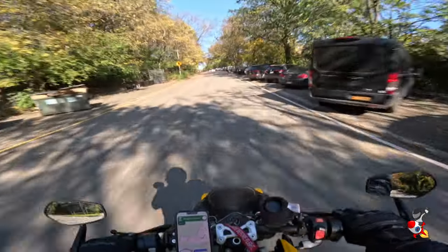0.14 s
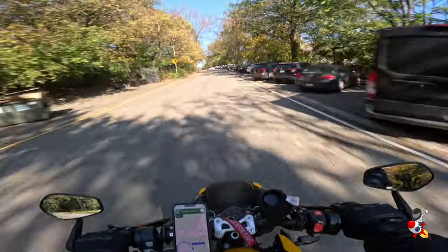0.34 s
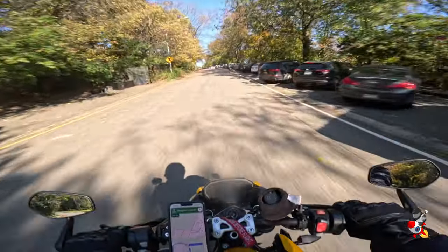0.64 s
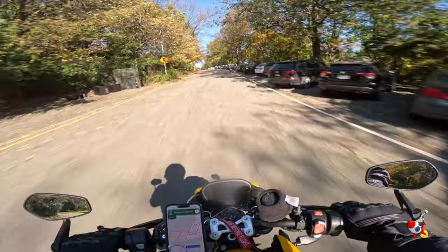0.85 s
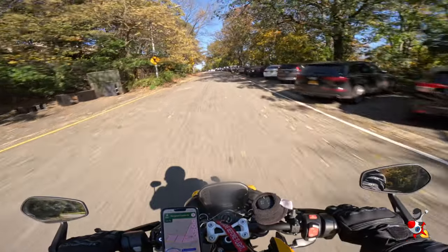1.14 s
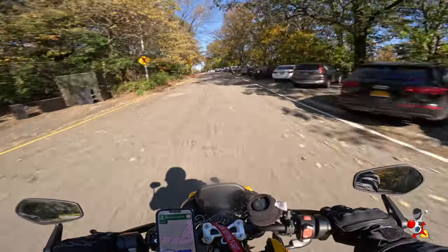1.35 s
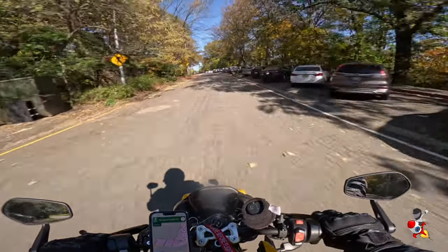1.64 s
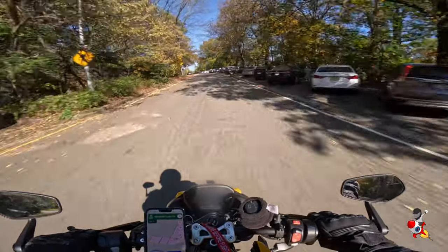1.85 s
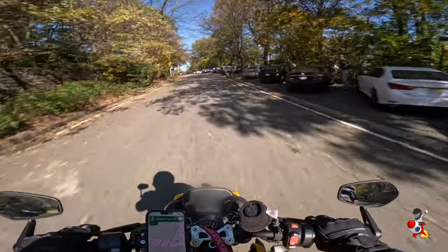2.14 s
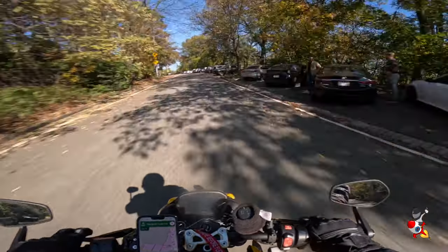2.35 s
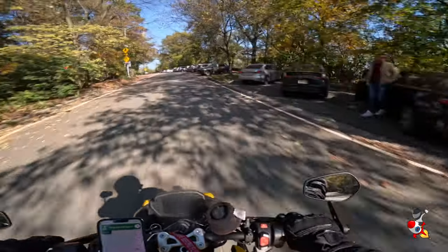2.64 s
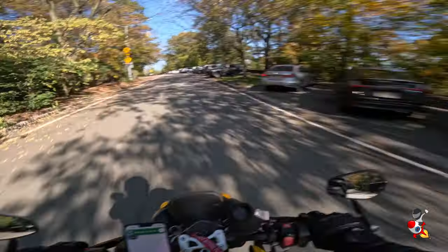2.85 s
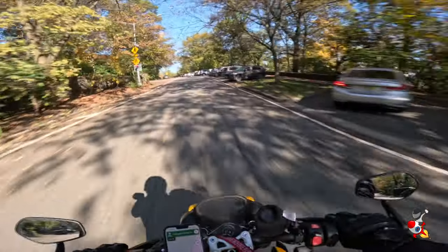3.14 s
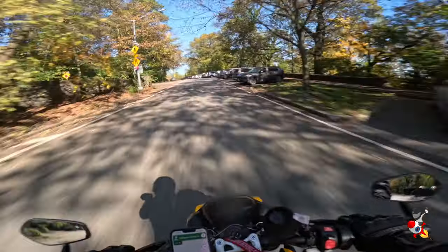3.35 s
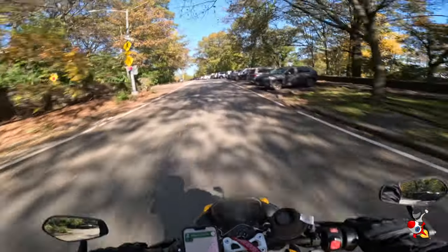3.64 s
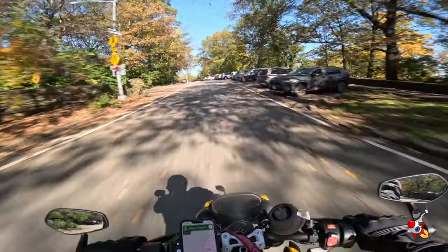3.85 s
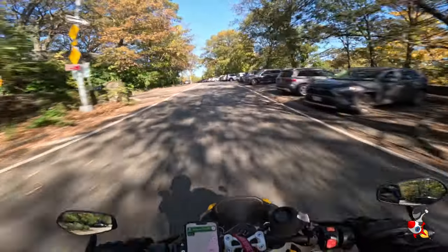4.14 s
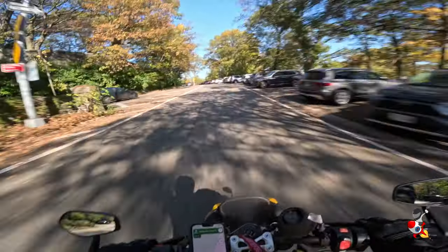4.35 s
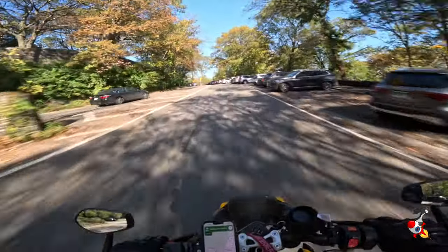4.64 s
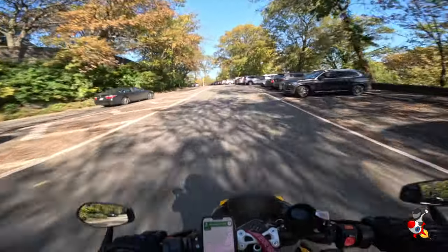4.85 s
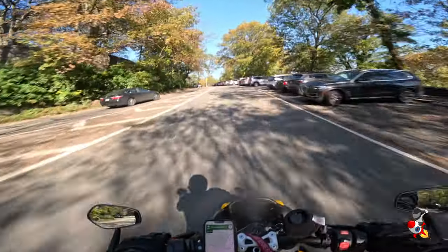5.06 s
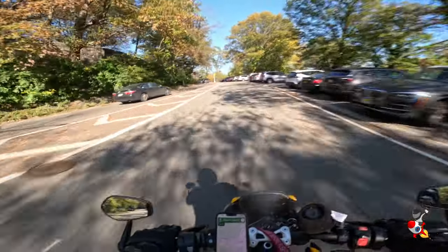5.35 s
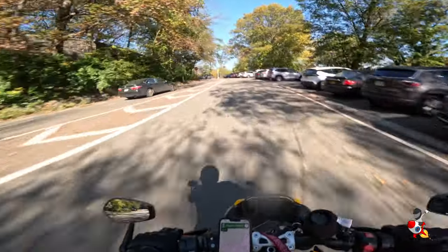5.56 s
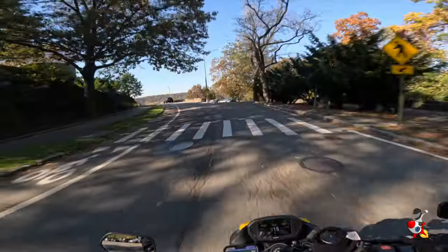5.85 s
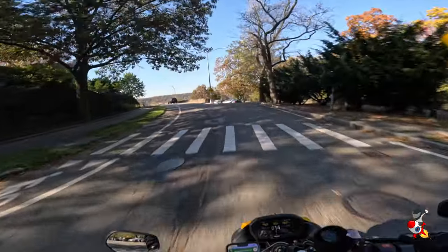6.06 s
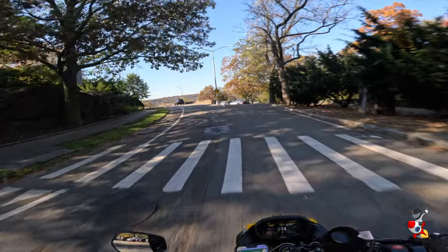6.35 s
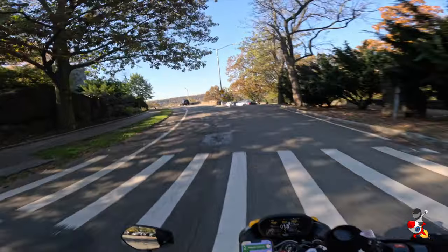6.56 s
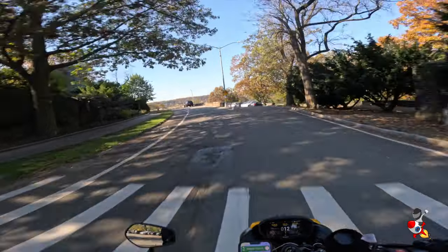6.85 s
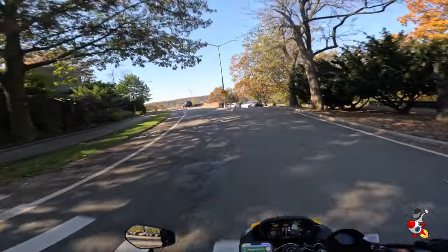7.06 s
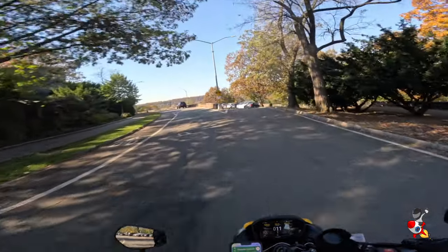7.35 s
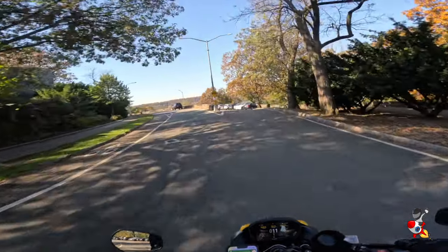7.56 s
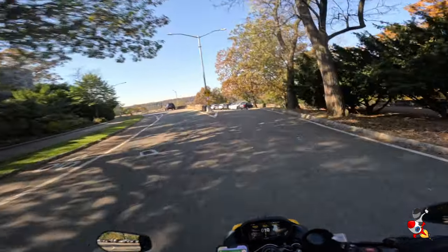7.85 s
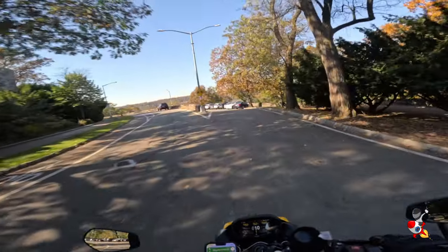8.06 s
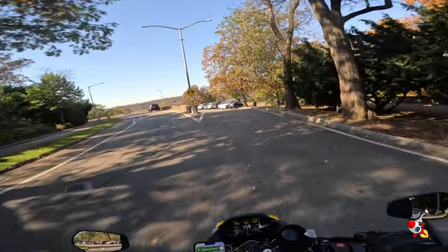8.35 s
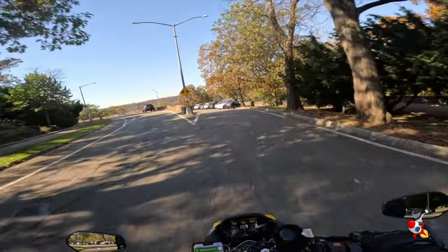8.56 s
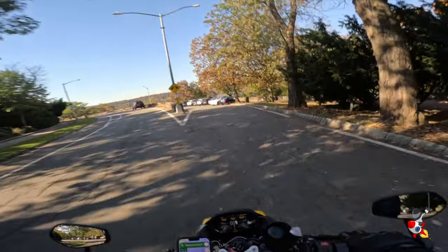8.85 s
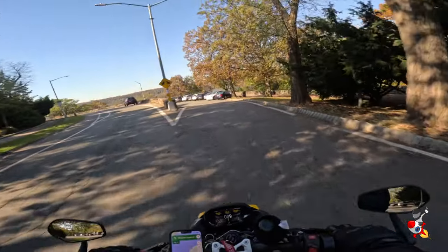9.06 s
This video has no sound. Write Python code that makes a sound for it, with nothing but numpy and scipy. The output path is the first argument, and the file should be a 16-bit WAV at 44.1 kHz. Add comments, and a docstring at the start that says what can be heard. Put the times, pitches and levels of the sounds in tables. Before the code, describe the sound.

Heard from the saddle, a motorcycle pulls gently, rolls off with soft exhaust pops, then cuts to a lower drone in light wind.

```python
"""A three-cylinder motorcycle on a park road, microphone at the saddle, in light wind and tyre roar.
Firing pulses ring the exhaust pipe while valves and gears rustle close by. The bike pulls gently, holds
its speed as gusts thump the microphone, then rolls off with a burble and pops of late-burning charges.
After an abrupt cut with a click it runs at lower revs, coasts with more soft pops and picks up again."""
import sys
import numpy as np
from scipy import signal
from scipy.fft import rfft, irfft, next_fast_len
from scipy.io import wavfile
from scipy.ndimage import uniform_filter1d

SR = 44100
rng = np.random.default_rng(int(sys.argv[2]) if len(sys.argv) > 2 else 0)


def unload_audio(sound):
    """Save the sound as a 16-bit wav file, at the path given as the first command line argument."""
    columns = np.transpose(np.atleast_2d(sound))
    # keep every value between -1 and 1, then stretch to whole-number steps
    steps = np.round(np.clip(columns, -1, 1) * 32767)
    wavfile.write(sys.argv[1], SR, steps.astype(np.int16))


N = 405719
TIME = np.arange(N) / SR
CUT_S = 5.845

# engine speed, cruising before the cut and rolling slowly after it: time_s, firing_hz
REVS_CRUISE = [(0, 83.1), (.5, 83.8), (.8, 86.9), (1.35, 94), (1.9, 100.8), (2.25, 103.5), (2.55, 104.6),
               (3.18, 102.2), (3.4, 103), (3.55, 101.1), (4, 99.1), (4.28, 98.8), (4.87, 96), (5.07, 90.5),
               (5.2, 92.6), (5.5, 86.9), (5.83, 82.6)]
REVS_SLOW = [(5.87, 63.2), (6.3, 62.5), (6.5, 64.2), (6.72, 64.3), (6.87, 59.6), (7, 61.1), (7.5, 51),
             (7.9, 45.2), (8.3, 45.7), (8.45, 44.5), (8.85, 45.7), (9.2, 47.4)]
# the rider's hand on the throttle: time_s, opening_share
THROTTLE_CRUISE = [(0, 0.45), (.48, 0.5), (.75, 0.74), (1.4, 1), (2.1, 1), (2.6, 0.81), (3.2, 0.58),
                   (3.9, 0.59), (4.84, 0.71), (4.97, 0.11), (5.8, 0.01)]
THROTTLE_SLOW = [(5.885, 0.033), (5.905, .55), (6.7, 0.7), (6.8, 0.059), (7.95, .03), (8.1, 0.32),
                 (8.8, 0.6), (9.2, 0.54)]
# the exhaust pipe's response, heard from the saddle: frequency_hz, relative_db
PIPE_CRUISE = [(40, -50), (110, 3), (250, 6.5), (295, -1), (345, 7.5), (420, -3), (530, 3), (620, -12),
               (715, -15.5), (825, -12.5), (950, -27), (1450, -22), (2500, -51.5), (6000, -94.5)]
PIPE_SLOW = [(35, -9), (90, -9.5), (135, 7.5), (190, 1.5), (238, -15.5), (280, -0.5), (325, 0), (385, -7.5),
             (500, -10), (580, -36), (720, -47), (900, -63), (2500, -65.5), (6000, -94)]
# how strongly the pipe booms at each low pitch on an open throttle: pitch_hz, relative_db
PIPE_BOOM = [(44, -44), (55, -35), (63, -35.5), (87, -32), (100, -37), (105, -38), (126, -34), (165, -37.5),
             (173, -36), (191, -42.5), (203, -36.5), (210, -34)]
# spectrum of the valve train and gears: frequency_hz, relative_db
RUSTLE_CRUISE = [(400, -13.5), (900, -11.5), (1700, -11), (2000, -13), (2300, -14.5), (2700, -16.5),
                 (3400, -22.5), (5300, -28), (6200, -34), (7200, -36), (8000, -45), (11500, -48.5),
                 (13500, -56)]
RUSTLE_SLOW = [(400, -24.5), (850, -31), (1050, -14.5), (1200, -26), (1400, -12), (1900, -18.5),
               (2250, -23.5), (2600, -25), (3000, -33), (4200, -37), (7000, -45), (8000, -52),
               (13500, -60.5)]
# the two rings of the engine cases: pitch_hz, width_hz, relative_db
CASE_RINGS = [(1348, 54, -17.5), (2040, 34, -17)]
# spells in which the lower ring rattles harder: start_s, end_s, rise_db
CASE_RATTLES = [(2.5, 3.35, 7), (8.2, 9.3, 7)]
# wind rumble on the microphone mixed with tyre and road roar: frequency_hz, relative_db
WIND_ROAD_SPECTRUM = [(15, -33), (45, 3.5), (100, -4.5), (250, -1), (450, -4), (700, -20), (1000, -34.5),
                      (1600, -47), (6000, -99)]
# strength of that rumble and roar: time_s, level_db
WIND_ROAD_LEVELS = [(0, -43.5), (2.7, -43), (3.4, -39.5), (4.7, -40.5), (5.5, -44.5), (7.5, -48),
                    (9.2, -45)]
# gusts that thump the microphone: centre_s, peak_db
BUFFETS = [(3.19, -32.5), (3.601, -31), (3.718, -32), (3.97, -41)]
# spells of uneven firing on a shut throttle: start_s, end_s, added_spread_share
BURBLES = [(5.12, 5.525, 0.23), (7.125, 8.318, 0.73)]
# late-burning charges in the pipe: start_s, relative_db
POPS = [(5.181, -25.5), (5.214, -27), (5.344, -27.5), (5.405, -25.5), (5.461, -23.5), (7.357, -29),
        (7.551, -26), (7.635, -26), (7.841, -30), (8.041, -26), (8.069, -30), (8.179, -28), (8.244, -29),
        (8.287, -25), (8.311, -22)]
# spectrum of one pop: frequency_hz, relative_db
POP_SPECTRUM = [(25, -25), (100, 12.5), (190, -3.5), (320, 4.5), (480, -16.5), (640, -38), (1200, -57),
                (6000, -83)]


def gain_of(db):
    """Decibels to amplitude."""
    return 10 ** (np.asarray(db) / 20)


def unit_rms(x):
    """Scales to an rms of one."""
    return x / np.sqrt(np.mean(x ** 2) + 1e-20)


def curve(rows):
    """A table of time_s and value, read at every sample."""
    return np.interp(TIME, *np.transpose(rows))


def spells(rows, fade_s=.12):
    """Each row of start_s, end_s and amount as a plateau with soft edges."""
    return sum(amount * np.clip(np.minimum(TIME - start, end - TIME) / fade_s + .5, 0, 1)
               for start, end, amount in rows)


def add(mix, start_s, sound):
    """Mixes a sound in at a time."""
    part = mix[round(start_s * SR):][:len(sound)]
    part += sound[:len(part)]


def ring(spectrum, size=16384, lag_below_hz=400):
    """Causal impulse response with the given spectrum, smeared so that its low tones leave late."""
    hz, db = np.transpose(spectrum)
    f = np.fft.fftfreq(size, 1 / SR)
    log_gain = np.log(gain_of(np.interp(np.log(abs(f) + 1), np.log(hz + 1), db)))
    minimum_phase = np.exp(np.conj(signal.hilbert(log_gain)))
    smear = ((lag_below_hz - 1j * f) / (lag_below_hz + 1j * f)) ** 2
    return np.fft.ifft(smear * minimum_phase).real[:size // 2]


def coloured(x, spectrum):
    """Passes x through a spectrum; rms one."""
    return unit_rms(signal.oaconvolve(x, ring(spectrum))[:N])


def above(x, hz):
    """The part of x above hz, with no phase shift."""
    return signal.sosfiltfilt(signal.butter(4, hz, "high", fs=SR, output="sos"), x)


def resonate(x, hz, width_hz):
    """A resonance of gain one that follows the curve hz."""
    carrier = np.exp(2j * np.pi * np.cumsum(hz) / SR)
    pole = np.exp(-np.pi * width_hz / SR)
    return 2 * (carrier * signal.lfilter([1 - pole], [1, -pole], x / carrier)).real


def drift(hz):
    """Random wander with motion up to about hz; rms one."""
    size = next_fast_len(N)
    f = np.fft.rfftfreq(size, 1 / SR)
    return unit_rms(irfft(rfft(rng.standard_normal(size)) / (1 + (f / hz) ** 2), size)[:N])


def fuzzy_tone(hz, width_hz):
    """A narrow band of noise around a steady or moving pitch."""
    angle = 2 * np.pi * np.cumsum(hz * np.ones(N)) / SR
    return unit_rms(drift(width_hz / 2) * np.cos(angle) + drift(width_hz / 2) * np.sin(angle))


def boom(firings, level_db, pipe, flutter_db, order):
    """One low order of the firing rate: a round tone that swells and lags through the pipe's resonances."""
    hz = order * np.gradient(firings) * SR
    pipe_phase = np.unwrap(np.angle(rfft(ring(pipe))))
    lag = np.interp(hz, np.linspace(0, SR / 2, len(pipe_phase)), pipe_phase)
    boom_db = np.interp(hz, *np.transpose(PIPE_BOOM)) + level_db + flutter_db * drift(8.8)
    return gain_of(boom_db) * np.sqrt(2) * np.cos(2 * np.pi * order * firings + lag)


def firing_spread(opening, open_share=.063, shut_share=.15):
    """Firing strength scatters more as the throttle shuts, and most in a spell of burbling."""
    return shut_share + (open_share - shut_share) * opening + spells(BURBLES)


def sharpen(sound, honk_hz, split_hz=600, neutral_hz=395, steepness=2.7, waver_db=3.5):
    """An open throttle steepens the pulses: the upper overtones swell as the honk rises, and waver."""
    top = above(sound, split_hz)
    return sound - top + top * (honk_hz / neutral_hz) ** steepness * gain_of(waver_db * drift(3.6))


def exhaust_bark(firings, level_db, honk_hz, unevenness, pipe, honk_gain, imbalance, puff, top_order=26):
    """Each firing rings the pipe with a pressure pulse and a puff of gas; a moving resonance honks."""
    index = np.arange(int(firings[-1]) + 2)
    cylinders = imbalance * np.cos(2 * np.pi * index / 3)
    spread = np.interp(index, firings, unevenness)
    chance = np.clip(rng.standard_normal(len(index)), -2, 2)
    strength = np.exp(cylinders + spread * chance - spread ** 2)
    angle = 2 * np.pi * (firings % 1) + 1e-6
    all_orders = np.sin((top_order + .5) * angle) / (2 * np.sin(angle / 2)) - .5
    pulses = unit_rms(all_orders - np.cos(angle) - np.cos(2 * angle))  # the boom carries orders 1 and 2
    # steady burning is clean; uneven burning blows much more loose gas
    gas_share = puff + 4.8 * np.interp(firings, index, spread) ** 2
    gas = gas_share * unit_rms(np.exp(-(firings % 1) / .5) * rng.standard_normal(N))
    piped = coloured(pulses * np.interp(firings, index, strength) + gas, pipe)
    bark = sharpen(piped + honk_gain * resonate(piped, honk_hz, width_hz=110), honk_hz)
    power = uniform_filter1d(uniform_filter1d(bark ** 2, size=6000), size=6000)
    return gain_of(level_db) * bark / np.sqrt(power + 1e-9)


def machinery(firings, firing_hz, rustle, clatter, cases_db, whine_db, overtone_db, mesh_ratio=27.5):
    """Valve rustle, ringing cases and a gear whine tied to the revs, all throbbing with the firings."""
    valves = coloured(rng.standard_normal(N), rustle)
    low, high = (gain_of(db + cases_db) * fuzzy_tone(hz, width_hz) for hz, width_hz, db in CASE_RINGS)
    cases = gain_of(spells(CASE_RATTLES)) * low + high
    whine = fuzzy_tone(mesh_ratio * firing_hz, width_hz=150)
    whine += gain_of(overtone_db) * fuzzy_tone(2 * mesh_ratio * firing_hz, width_hz=300)
    throb = 1 + clatter * np.cos(2 * np.pi * firings)
    return unit_rms((valves + cases + gain_of(whine_db) * whine) * throb) * gain_of(.35 * drift(27))


def engine(revs, throttle, pipe, rustle, *, usual_hz, note_overrun_db, octave_db, octave_overrun_db,
           flutter_db, bark_db, bark_overrun_db, bark_db_per_octave, imbalance, puff,
           honk_shut_hz, honk_throttle_hz, honk_slope, honk_gain,
           machinery_db, clatter, cases_db, whine_db, overtone_db,
           burn_on_s=.096, overrun_below=.5, boom_load_db=5, bark_load_db=5.5):
    """Revs and throttle drive boom, bark and machinery; on the overrun the firing note stands out."""
    firing_hz, opening = curve(revs), np.clip(curve(throttle), 0, 1)
    firings = np.cumsum(firing_hz * (1 + .002 * drift(14))) / SR  # running count
    rev_octaves = np.log2(firing_hz / usual_hz)
    # the burn picks up at once but dies a moment after the throttle shuts
    burn = np.maximum(opening, np.interp(TIME - burn_on_s, TIME, opening))
    starved = np.maximum(1 - burn / overrun_below, 0)
    overrun = np.maximum(1 - opening / overrun_below, 0)  # the wheel drives the engine

    eased_db = boom_load_db * (burn - 1)
    note = boom(firings, eased_db + note_overrun_db * overrun, pipe, flutter_db=1, order=1)
    octave = boom(firings, eased_db + octave_db + octave_overrun_db * starved, pipe, flutter_db, order=2)

    load_db = bark_load_db * (burn - 1) + bark_overrun_db * starved
    exhaust_db = bark_db + load_db + bark_db_per_octave * rev_octaves
    honk_hz = honk_shut_hz + honk_throttle_hz * opening + honk_slope * (firing_hz - usual_hz)
    bark = exhaust_bark(firings, exhaust_db, honk_hz, firing_spread(opening),
                        pipe, honk_gain, imbalance, puff)

    # the machinery grows with the revs; on the overrun it eases and its whine comes forward
    works = machinery(firings, firing_hz, rustle, clatter, cases_db, whine_db + 5 * overrun, overtone_db)
    works_db = machinery_db + 4.5 * rev_octaves - 1.6 * overrun
    return note + octave + bark + gain_of(works_db) * works


def wind_and_road(usual_db=-44, dulling=1.4, lumps_db=1.4, buffet_hz=65, buffet_s=.05):
    """Wind rumble on the microphone mixed with tyre and road roar, duller when weak; a few gusts thump."""
    level_db = curve(WIND_ROAD_LEVELS)
    roar = coloured(rng.standard_normal(N), WIND_ROAD_SPECTRUM)
    rush = above(roar, hz=520)
    roar = roar - rush + rush * gain_of(dulling * np.minimum(level_db - usual_db, 0))
    out = roar * gain_of(level_db + lumps_db * drift(25))
    t = np.arange(0, buffet_s, 1 / SR)
    for centre_s, peak_db in BUFFETS:
        thump = np.hanning(len(t)) * np.sin(2 * np.pi * (buffet_hz * t + rng.random()))
        add(out, centre_s - buffet_s / 2, gain_of(peak_db) * thump)
    return out


def exhaust_pops(trim_db=-3):
    """Each late-burning charge rings the pipe once."""
    out, pop = np.zeros(N), ring(POP_SPECTRUM)
    for start_s, relative_db in POPS:
        add(out, start_s, gain_of(relative_db + trim_db) * pop / abs(pop).max())
    return out


def cut_click(peak_db=-31, decay_s=.002):
    """The abrupt cut leaves a step in the pressure: one dry click."""
    out, t = np.zeros(N), np.arange(SR // 10) / SR
    add(out, CUT_S, gain_of(peak_db) * np.exp(-t / decay_s))
    return out


def scene():
    """Two stretches of the ride in mono from the saddle, joined by a hard cut."""
    cruise = engine(REVS_CRUISE, THROTTLE_CRUISE, PIPE_CRUISE, RUSTLE_CRUISE, usual_hz=95.25,
                    note_overrun_db=7.5, octave_db=1.43, octave_overrun_db=-16, flutter_db=2,
                    bark_db=-34, bark_overrun_db=-9, bark_db_per_octave=-13, imbalance=.016, puff=.37,
                    honk_shut_hz=280, honk_throttle_hz=148, honk_slope=4.87, honk_gain=7.7,
                    machinery_db=-57, clatter=.069, cases_db=2.5, whine_db=-12.5, overtone_db=-15)
    slow = engine(REVS_SLOW, THROTTLE_SLOW, PIPE_SLOW, RUSTLE_SLOW, usual_hz=55,
                  note_overrun_db=4.5, octave_db=-4.5, octave_overrun_db=-14, flutter_db=.3,
                  bark_db=-35.5, bark_overrun_db=-11, bark_db_per_octave=.5, imbalance=.03, puff=.13,
                  honk_shut_hz=313, honk_throttle_hz=10, honk_slope=2.8, honk_gain=.28,
                  machinery_db=-63, clatter=.091, cases_db=3, whine_db=-8, overtone_db=-25)
    before_cut = np.clip((CUT_S - TIME) * 400 + .5, 0, 1)  # 2.5 ms crossfade
    motorcycle = before_cut * cruise + (1 - before_cut) * slow
    return (motorcycle + wind_and_road() + exhaust_pops() + cut_click())[None]


def record(dry):
    """The microphone chain falls off steeply above 13.5 kHz."""
    return signal.sosfilt(signal.ellip(8, .1, 80, 13500, fs=SR, output="sos"), dry)


dry = scene()
out = record(dry)
unload_audio(out)
```